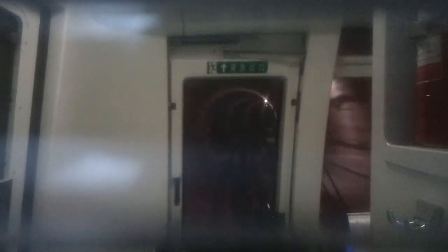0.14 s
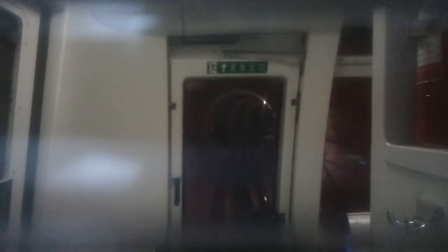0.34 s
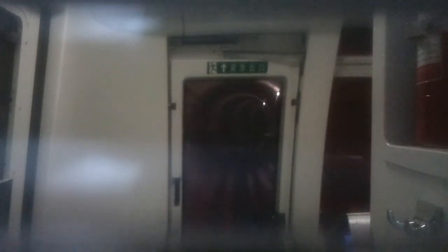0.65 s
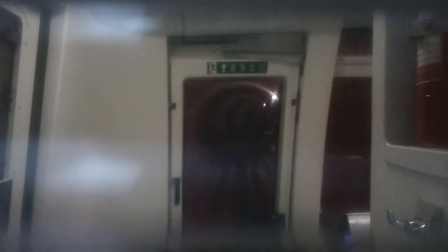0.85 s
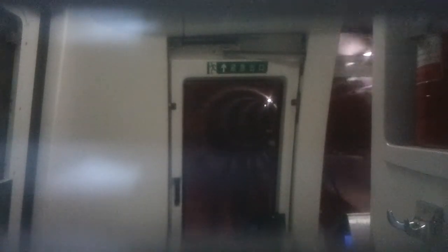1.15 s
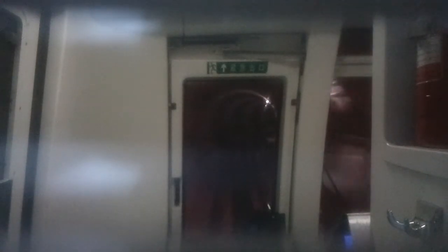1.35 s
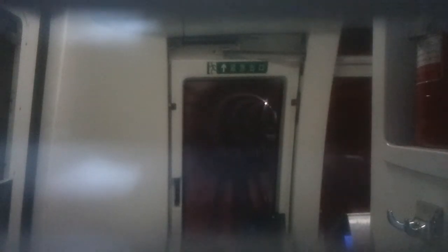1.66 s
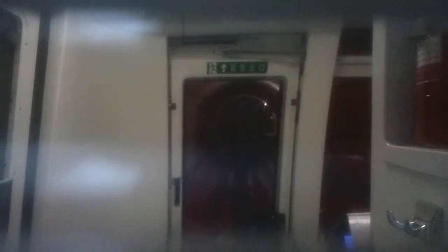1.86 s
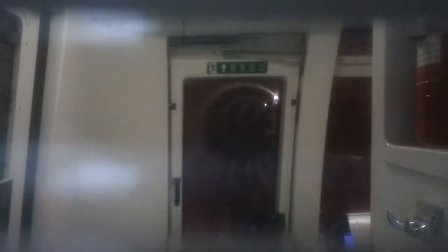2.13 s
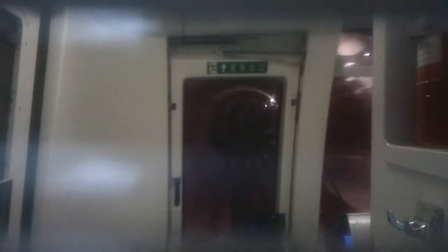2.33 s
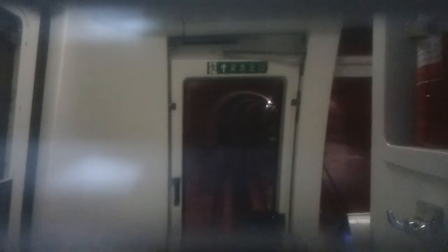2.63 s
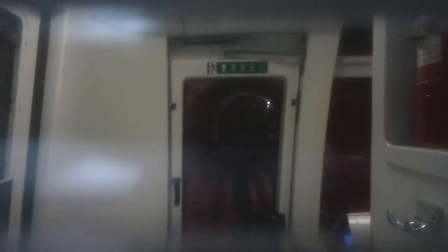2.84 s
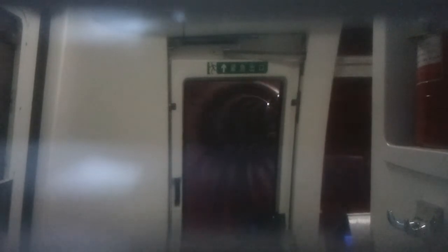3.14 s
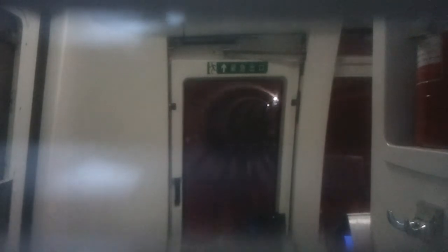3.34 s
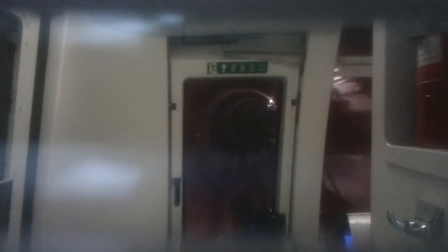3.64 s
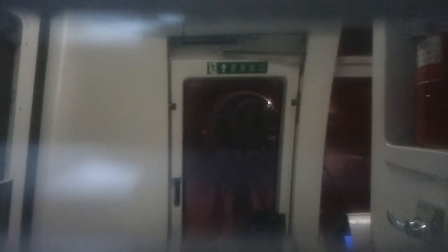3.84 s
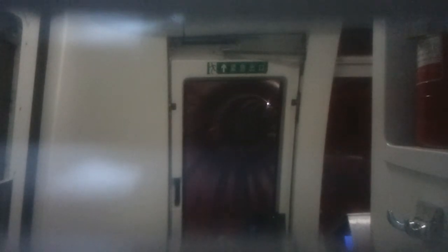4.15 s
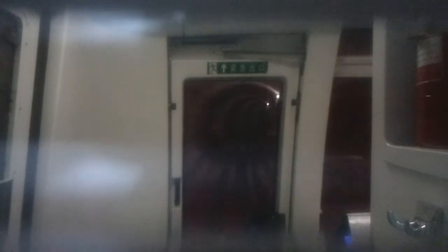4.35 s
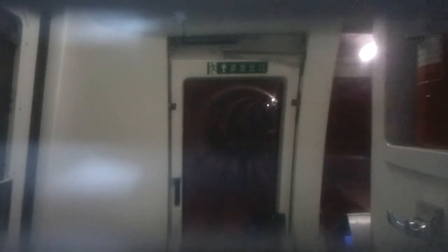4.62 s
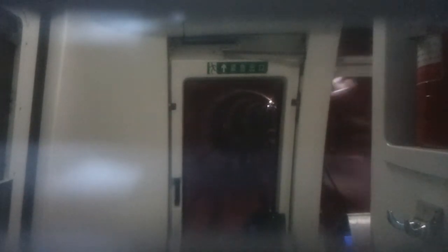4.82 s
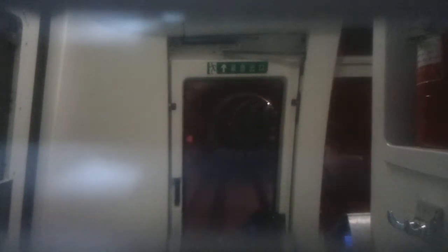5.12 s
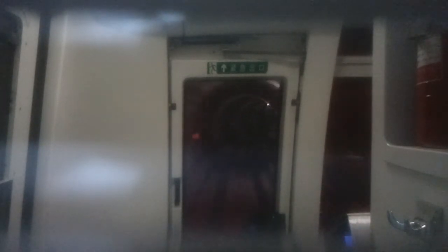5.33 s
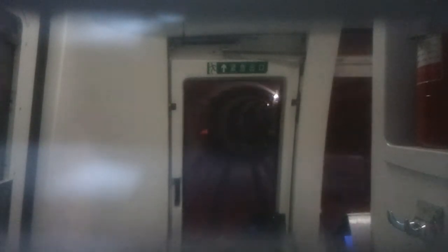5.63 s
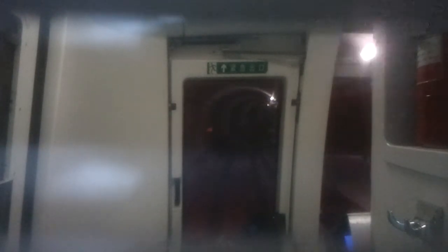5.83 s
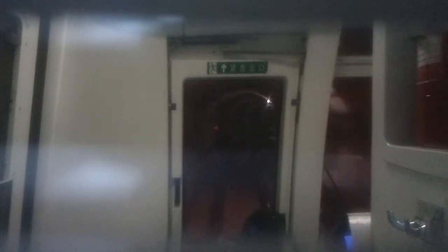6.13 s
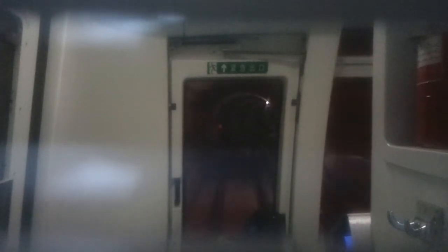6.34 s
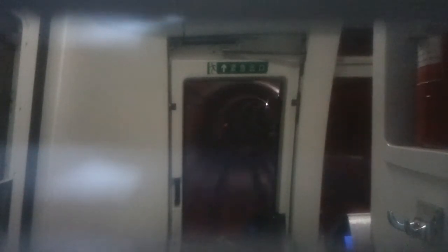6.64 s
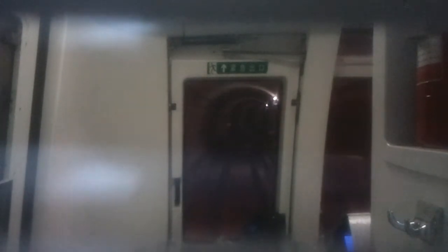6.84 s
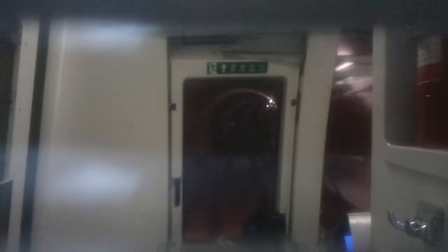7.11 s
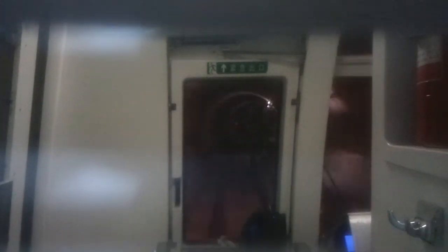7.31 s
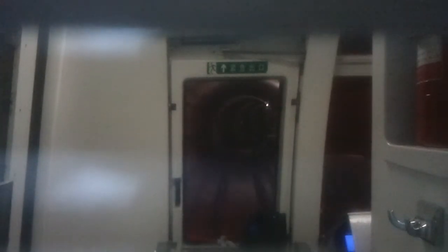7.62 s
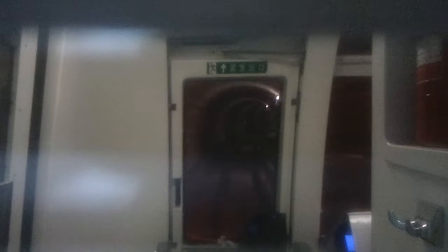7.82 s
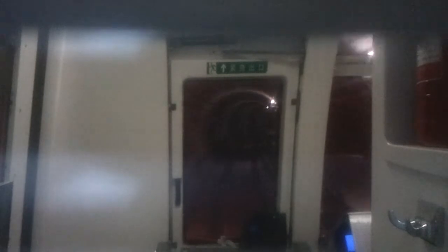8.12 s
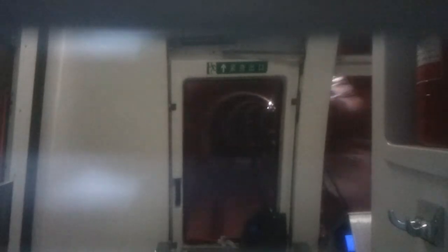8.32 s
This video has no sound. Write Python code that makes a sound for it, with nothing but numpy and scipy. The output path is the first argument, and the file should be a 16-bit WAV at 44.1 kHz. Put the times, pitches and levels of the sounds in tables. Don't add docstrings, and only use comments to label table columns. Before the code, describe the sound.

A deep, uneven rumble pounds through a moving underground train car, distorted and fluttering at a cheap microphone, above subdued wheel noise and faint hiss.

```python
import sys
import numpy as np
from scipy import signal
from scipy.fft import rfft, irfft, next_fast_len
from scipy.io import wavfile
from scipy.ndimage import uniform_filter1d, map_coordinates

SR = 44100
rng = np.random.default_rng(int(sys.argv[2]) if len(sys.argv) > 2 else 0)


def natural_amplitude(level_db):
    exponent = np.asarray(level_db, float) / 20
    return 10 ** exponent


def output_pcm(signal):
    pcm = np.clip(np.atleast_2d(signal).T, -1, 1) * 32767
    wavfile.write(sys.argv[1], SR, np.round(pcm).astype(np.int16))


N = 373527
DAMPING_DB = 14


def unit(x):
    return x / np.sqrt(np.mean(x ** 2) + 1e-20)


def curves(rows):
    s, *cols = np.transpose(rows)
    return [np.interp(np.arange(N) / SR, s, c) for c in cols]


def humps(rows):
    s, half, *cols = np.transpose(rows)
    t = np.arange(0, N / SR + .01, .005)
    reach = np.clip((t[:, None] - s) / half, -1, 1)
    shape = np.cos(np.pi / 2 * reach) ** 2
    return [np.interp(np.arange(N) / SR, t, shape @ c) for c in cols]


def wobble(rate):
    knots = rng.standard_normal(int(N * rate / SR) + 4)
    return map_coordinates(knots, [np.arange(N) * rate / SR])


def rush(spectrum, patchy_db):
    z = signal.stft(rng.standard_normal(N + 512), nperseg=512)[2]
    field = uniform_filter1d(rng.standard_normal(z.shape), size=5, axis=0)
    field = uniform_filter1d(field, size=8, axis=1)
    x = signal.istft(z * natural_amplitude(patchy_db * unit(field)), nperseg=512)[1]
    m = next_fast_len(len(x))
    hz, db = np.transpose(spectrum)
    log_hz = np.log(np.fft.rfftfreq(m, 1 / SR) + 1)
    colour = natural_amplitude(np.interp(log_hz, np.log(hz + 1), db, -120, -120))
    return unit(irfft(rfft(x, m) * colour, m)[:N])


def mode(db, hz, waver_hz, waver_db):
    phase = 2 * np.pi * np.cumsum(hz + waver_hz * wobble(20)) / SR
    return np.sqrt(2) * natural_amplitude(db + waver_db * wobble(22)) * np.sin(phase)


# time in seconds, shaking in dB, boom pitch in Hz.
RIDE = [(0.0, -17.5, 64.35), (0.5, -19, 67.94), (0.85, -15.5, 70.98), (1.3, -13, 68.06), (1.6, -12, 69.95),
        (1.86, -13, 59), (2.1, -9.5, 65), (2.75, -8.5, 63.93), (3.2, -10, 53.52), (3.55, -9, 69.97),
        (3.8, -10, 57.07), (4.15, -8.5, 70.13), (4.4, -9.5, 64), (5.0, -9, 63.73), (6.0, -10, 60),
        (6.6, -9, 63.64), (7.2, -8, 61.9), (8.47, -10.5, 62.95)]
# time in seconds, half length in seconds, boom loss in dB.
BUMPS = [(0.15, 0.15, 17.5), (0.61, 0.036, 6), (0.85, 0.052, 2), (1.1, 0.067, 5), (1.59, 0.027, 3),
         (1.78, .05, 3.5), (2.03, 0.13, 7), (2.23, 0.057, 11), (2.34, .05, 7.5), (2.6, .05, 4),
         (7.02, .04, 8), (3.03, 0.097, 6), (3.27, .11, 17), (3.49, 0.074, 12), (3.6, 0.05, 5),
         (3.8, 0.057, 11), (3.93, .05, 5), (4.18, 0.043, 3), (4.53, .06, 11), (4.72, 0.11, 8),
         (5.33, 0.045, 11), (5.78, .09, 9), (5.97, 0.12, 9), (6.1, 0.14, 2), (6.48, 0.1, 15),
         (7.17, 0.047, 7), (7.6, 0.06, 10), (7.85, .1, 4), (7.95, 0.06, 8), (8.23, 0.068, 18)]
# time in seconds, half length in seconds, pitch rise in Hz.
SHIFTS = [
    (4.64, .17, 9),
    (6.5, .13, 14),
    (7.9, .13, 7.97),
]
# time in seconds, half length in seconds, hush in
# dB.
CALMS = [(1.9, 0.072, -0.5), (3.6, 0.058, -1), (4.46, 0.047, 4.5), (4.83, 0.035, 11.5), (5.0, 0.094, 7.5),
         (5.54, 0.12, 0.5), (6.25, 0.069, 7.5), (6.63, 0.06, 3), (7.28, 0.095, 6.5), (10, 0.034, 3.5),
         (0.15, 0.11, 2), (8.8, 0.058, 3), (3.6, 0.032, 4.5)]
# frequency in Hz, density in dB per Hz.
SHUDDER = [(40, -28.5), (54, -5.5), (65, 2), (76, -5.5), (95, -34)]


def boom():
    shake_db, boom_hz = curves(RIDE)
    (loss_db,), (rise_hz,), (hush_db,) = humps(BUMPS), humps(SHIFTS), humps(CALMS)
    boom_db = shake_db - loss_db + .3 * hush_db
    tone = mode(boom_db + 3.0, boom_hz + rise_hz, waver_hz=3.0, waver_db=1.22)
    shudder_db = boom_db - 6 - .8 * hush_db
    return tone + natural_amplitude(shudder_db) * rush(SHUDDER, patchy_db=.3)


# time in seconds, half length in seconds, kick in dB.
KICKS = [(0.0, .07, 4.5), (0.52, 0.087, 7), (0.81, 0.044, 7), (0.94, .06, 4), (1.18, 0.11, 1.5),
         (1.72, 0.077, 4.5), (2.01, 0.11, 4.5), (2.13, .05, 6), (2.33, 0.057, 12), (2.61, 0.032, 7),
         (2.79, 0.06, 5), (2.97, 0.055, 5), (3.12, .13, 11), (3.55, 0.17, 10), (3.74, 0.066, 6.5),
         (3.9, 0.12, 11), (4.3, .08, 1.5), (4.59, .09, 7.5), (4.73, 0.13, 8.5), (5.08, 0.036, 3),
         (5.7, 0.082, 6.5), (5.91, 0.055, 8), (6.07, 0.14, 7.5), (6.33, 0.036, 10), (6.47, 0.12, 4.5),
         (6.75, 0.1, 7.5), (7.17, 0.035, 8.5), (7.45, 0.066, 8), (7.8, 0.12, 6.5), (8.36, 0.31, 7)]
# frequency in Hz, density in dB per Hz.
DRUM = [(62, -34), (74, 5), (90, -3), (105, -6), (125, -17), (170, -43)]


def floor_drum():
    shake_db = curves(RIDE)[0]
    (kick_db,), (hush_db,) = humps(KICKS), humps(CALMS)
    drum_db = 0.65 * shake_db - 14 + kick_db - 2.3 * hush_db
    tone = mode(drum_db + 5.0, 88, waver_hz=7.996, waver_db=0.84)
    return tone + natural_amplitude(0.59 * drum_db - 7.0) * rush(DRUM, patchy_db=-0.3)


# time in seconds, size in dB.
LURCHES = [(0.5, 3), (1.08, 2.5), (1.36, -11.5), (2.13, 13), (2.82, 9.5), (3.24, 14), (3.55, -4),
           (3.82, 11), (4.38, 15.5), (4.75, 17.5), (5.0, 5.5), (5.25, 8.5), (5.43, 12), (5.72, 12.5),
           (5.85, 6.5), (6.05, 13), (6.75, 10), (6.98, -22), (7.07, 6), (7.45, 5), (8.12, 15), (8.45, 12.5)]
# frequency in Hz, density in dB per Hz.
SWAY = [(12, -37), (25, -12), (40, -12), (50, -4.5), (58, -5.5), (70, -38)]


def bogie_sway():
    half_s, rest_db = 0.097, -29
    lurch_db, = humps([(s, half_s, db) for s, db in LURCHES])
    sway_db = rest_db + lurch_db
    tone = mode(sway_db + 2.0, 45, waver_hz=4.51, waver_db=2.5)
    return tone + natural_amplitude(0.59 * sway_db - 4.5) * rush(SWAY, patchy_db=0.0)


# frequency in Hz, density in dB per Hz.
RUMBLE = [(74, -22), (125, -0.5), (140, -5), (210, -4), (248, -7.5), (290, -8.5), (380, -37), (640, -120)]


def rail_rumble():
    shake_db, (hush_db,) = curves(RIDE)[0], humps(CALMS)
    rumble_db = -30 + .7 * (shake_db - shake_db.max()) - 0.37 * hush_db
    return natural_amplitude(rumble_db + 2.0) * rush(RUMBLE, patchy_db=-0.5)


# time in seconds, effort in dB.
EFFORT = [
    (0.0, 0.5),
    (1.9, 3),
    (2.6, -5),
    (3.7, -3.5),
    (5.0, -5),
    (6.0, -6.5),
    (7.5, -7.5),
    (8.1, -2),
    (8.47, 1),
]
# frequency in Hz, density in dB per Hz.
ROAR = [(160, -46), (270, -14), (301, -6.5), (333, 0.5), (414, -5.5), (462, -1), (519, -2.5), (696, 0),
        (738, -3), (802, -7.5), (965, -14), (1520, -15.5), (1610, -14.5), (1750, -33.5), (2000, -39.5),
        (2600, -59.5), (4400, -120)]


def wheel_roar(jolts):
    (effort_db,), (hush_db,) = curves(EFFORT), humps(CALMS)
    roar_db = -24.5 + 0.099 * effort_db - .6 * hush_db
    return natural_amplitude(roar_db + 1.0 + 1.0 * jolts + 0.66 * wobble(9.8)) * rush(ROAR, patchy_db=1.0)


# frequency in Hz, density in dB per Hz.
HISS = [(1000, -26.5), (1700, -3.5), (1830, -9), (2110, -17), (2430, -7.5), (3120, -2), (3970, -12.5),
        (6100, -17), (7050, -13), (8200, -11), (10700, -54.5), (18000, -120)]


def air_hiss(jolts):
    (effort_db,), (hush_db,) = curves(EFFORT), humps(CALMS)
    hiss_db = -42 + 0.38 * effort_db - .8 * hush_db
    return natural_amplitude(hiss_db - 2.5 + 1.0 * jolts) * rush(HISS, patchy_db=2.6)


def motors():
    (effort_db,), (hush_db,) = curves(EFFORT), humps(CALMS)
    howl_db = -32 + effort_db - 0.66 * hush_db + 1.5 * wobble(9.7)
    whine_db = -47.5 + 0.35 * effort_db
    howl = mode(howl_db - 9, 693 + 5.93 * wobble(6), waver_hz=22.1, waver_db=3)
    whine = mode(whine_db - 11, 3190 + 31.0 * wobble(5), waver_hz=91, waver_db=4.5)
    return howl + whine


def scene():
    body = boom() + floor_drum() + bogie_sway()
    jolts = wobble(30)
    wheels = rail_rumble() + wheel_roar(jolts) + air_hiss(jolts)
    return (body + natural_amplitude(DAMPING_DB) * (wheels + motors()))[None]


# bin number, gain in dB.
SPARED = [
    (0, 0.5),
    (1, 2),
    (2, -10),
    (128, -0.5),
]


def damped(x):
    frame, first = 256, 85
    hop = frame // 2
    count = len(x) // hop + 3
    x = np.pad(x, (frame - first, 3 * frame))
    starts = hop * np.arange(count)[:, None]
    frames = x[starts + np.arange(frame)] * signal.get_window("hann", frame)
    gain_db = np.full(hop + 1, -float(DAMPING_DB))
    for k, db in SPARED:
        gain_db[round(k)] = db
    frames = irfft(rfft(frames) * natural_amplitude(gain_db), frame)
    return (frames[:-1, hop:] + frames[1:, :hop]).ravel()[hop - first:]


def roll_off(x):
    return signal.sosfilt(signal.butter(12, 15720, fs=SR, output="sos"), x)


def record(dry):
    x = dry[0] / (1 + np.abs(dry[0] / .64) ** 2.5) ** .4
    x = x + natural_amplitude(DAMPING_DB - 50.5) * rush(HISS, patchy_db=1.0)
    x = np.pad(x, (0, 2205), "reflect")
    x = damped(signal.resample_poly(x, 160, 441))
    x = np.clip(x, -.705, .705)
    smooth = signal.firwin(30 * 441 + 1, 8000, window=("kaiser", 9), fs=16000 * 441)
    x = signal.resample_poly(x, 441, 160, window=smooth)[None, :N]
    x = np.clip(x, -.709, .709)
    return roll_off(x)


dry = scene()
out = record(dry)
output_pcm(out)
```